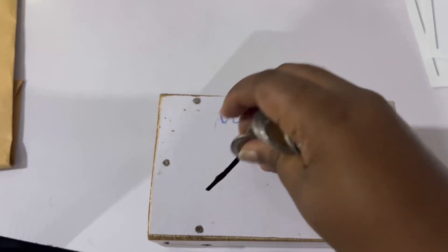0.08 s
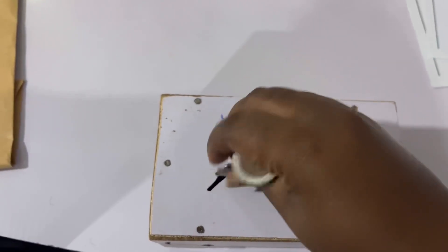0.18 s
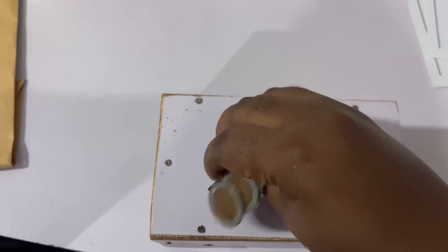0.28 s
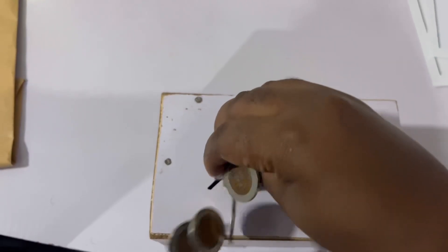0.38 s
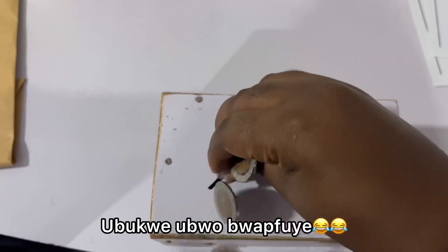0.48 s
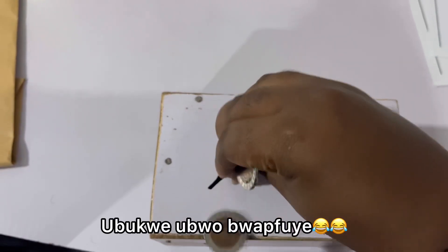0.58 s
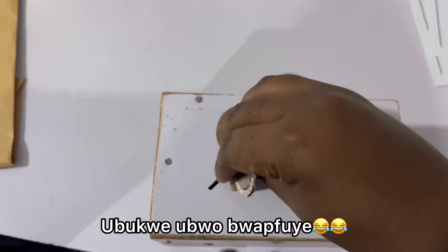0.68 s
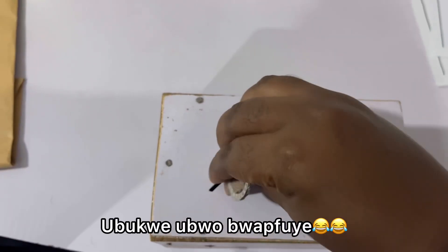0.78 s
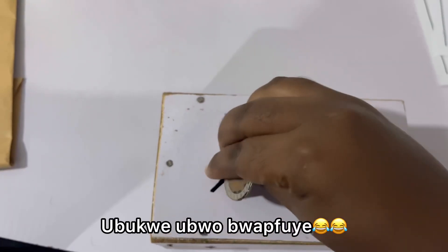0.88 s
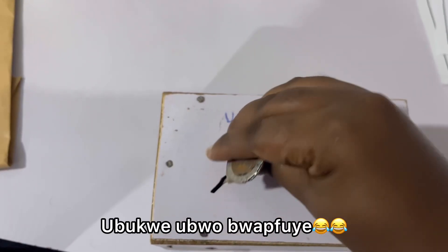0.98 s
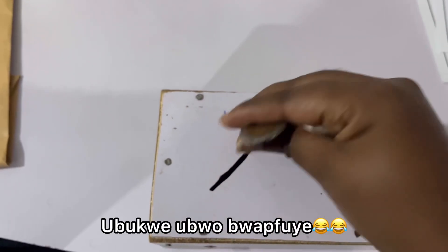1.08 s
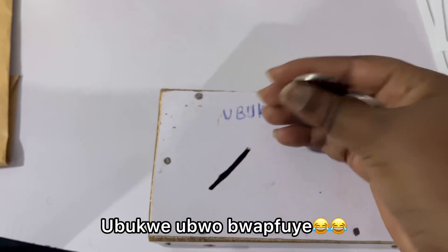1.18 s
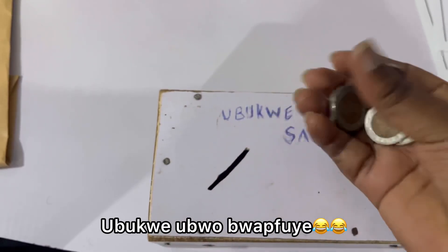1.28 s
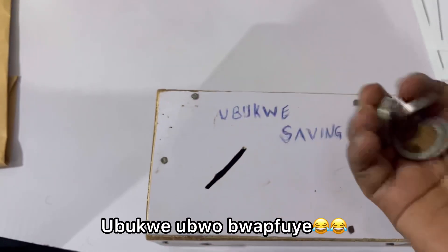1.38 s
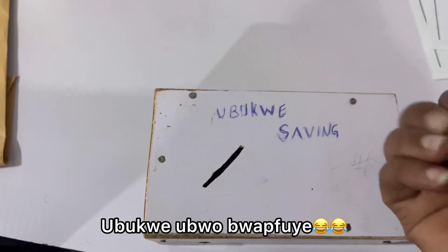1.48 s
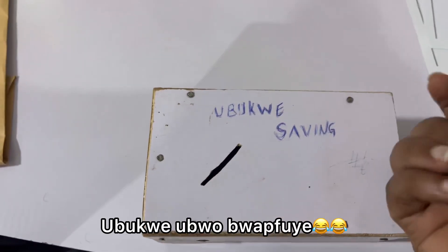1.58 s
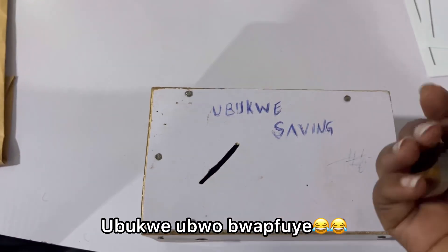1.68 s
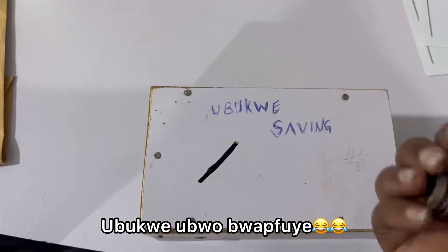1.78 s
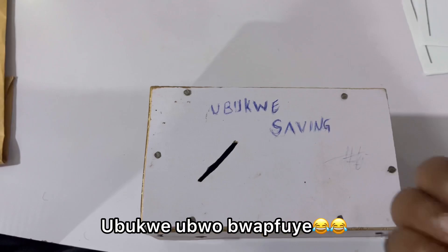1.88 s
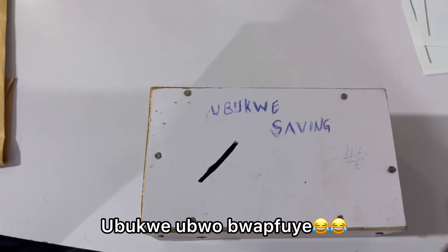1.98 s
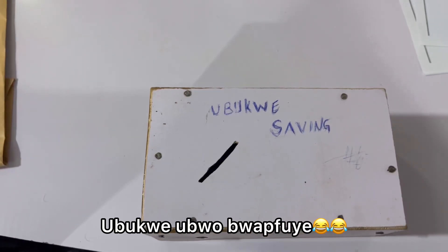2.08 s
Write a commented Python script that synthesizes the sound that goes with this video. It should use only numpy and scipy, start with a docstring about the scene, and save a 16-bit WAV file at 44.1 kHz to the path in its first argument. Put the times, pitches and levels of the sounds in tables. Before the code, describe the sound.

Coins clatter against a small wooden money box, close-miked in a bare, echoing room. Faint hand clinks lead to a first knock at 0.2 s; coins bounce on the damped lid at 0.33-0.6 s, while others rattle and thump hollowly inside from 0.5 to 0.96 s. After a lull, leftover coins clink in the hand, brightest at 1.46-1.57 s, then fade to light jingles until 2.15 s over a faint low hum.

```python
"""Close to the microphones in a bare room, a handful of coins is pushed at the slot of a small wooden money box.
First come faint clinks in the hand, then some coins spill and bounce on the lid, a damped wooden plate;
others drop inside and clatter, as bursts of coloured noise, and thump the ringing body of the box.
Then the hand draws back and the coins left in it clink together. Loose coins sing now and then as wavering
sines; a decaying stereo tail gives the room, and a steady low background lies under it all."""
import sys
import numpy as np
from scipy import signal
from scipy.fft import rfft, irfft
from scipy.io import wavfile

SR = 44100
rng = np.random.default_rng(int(sys.argv[2]) if len(sys.argv) > 2 else 0)


def transcribe(u):
    """Save the signal u as a 16-bit wav file named by the first command-line argument.

    u: samples, shape (n,) or (channels, n), limited to [-1, 1]; the rate is SR.
    q: integer samples, one column per channel.
    """
    v = np.clip(np.atleast_2d(u).T, -1, 1)
    q = np.round(v * 32767).astype(np.int16)
    wavfile.write(sys.argv[1], SR, q)


N = 94815
T = np.arange(N) / SR

# Coins bounce on the lid. Each row: start in seconds, wood level in dB, pitch ratio,
# hardness in dB per octave, then clack, clash, jingle and ting levels in dB.
LID_HITS = [(0.2089, -7.5, 1.0, -5, -21, -17.5, -16.5, -40),
            (0.3324, -13, 0.96, 8.5, -10, -21, -3.5, -12.5),
            (0.3660, 1.5, 0.94, -0.5, -14.5, -8.5, -5, -24), (0.3934, 0.5, 0.93, 0.5, -9, -9, -5.5, -21),
            (0.4922, 2, 0.94, -1, -3.5, -6.5, -5, -20), (0.606, -7.5, 0.97, 3, -34, -8, -2, -18.5)]
# Coins clatter in the slot and the box. Each row: start in seconds, decay time constant in seconds,
# then clack, clash, jingle and ting levels in dB.
CLATTERS = [(0.5175, 0.0088, -22, -28, -38, -27.5), (0.5652, 0.01, -8.5, -26, -42, -30.5),
            (0.587, 0.0033, -17, -33.5, -20, -37), (0.595, 0.008, -15.5, -24, -27, -51),
            (0.7265, 0.013, -8.5, -9, -23.5, -44), (0.7405, 0.0035, -5.5, -4.5, -11.5, -26),
            (0.751, 0.018, -17.5, -18, -39, -34), (0.7668, 0.004, -9.5, -21, -20, -26),
            (0.8555, 0.0068, -43, -28, -26, -26.5), (0.8665, 0.015, -45, -21.5, -16.5, -23.5),
            (0.89, 0.015, -45, -28, -25, -24), (0.9065, 0.0037, -15, -20.5, -19.5, -33),
            (0.9155, 0.0051, -21.5, -23.5, -21.5, -16), (0.9615, 0.0072, -29, -26, -29.5, -45)]
# A loose coin rattles on between bounces. Each row: start in seconds, decay time constant in seconds,
# then clack, clash, jingle and ting levels in dB.
RATTLES = [(0.325, 0.008, -29.5, -23.5, -34.5, -45), (0.344, 0.061, -22, -23, -32.5, -25.5),
           (0.401, 0.0091, -39.5, -21, -38, -31), (0.926, 0.022, -26, -29.5, -35.5, -33)]
# Coins clink in the hand. Each row: start in seconds, decay time constant in seconds,
# then clack, clash, jingle and ting levels in dB.
CLINKS = [(0.008, 0.0053, -37.5, -37.5, -37.5, -33.5), (0.0905, 0.0026, -41, -32.5, -28.5, -27.5),
          (0.176, 0.043, -57, -43, -37.5, -43), (0.198, 0.019, -36, -59, -29.5, -35),
          (0.2155, 0.00096, -31, -22.5, -19, -17.5), (0.2682, 0.0017, -45.5, -34, -21.5, -38),
          (0.2955, 0.003, -46, -34, -27.5, -39), (0.3135, 0.017, -57, -42, -42, -34),
          (1.165, 0.0074, -34.5, -35.5, -34.5, -38), (1.178, 0.0011, -42, -32, -28.5, -29),
          (1.231, 0.0081, -63, -61, -39, -43), (1.278, 0.0017, -48, -54, -36.5, -33),
          (1.309, 0.013, -42.5, -42.5, -42, -41), (1.379, 0.0033, -34, -37, -27, -24),
          (1.3872, 0.0068, -28, -25.5, -24, -23), (1.41, 0.025, -41.5, -28, -19, -19),
          (1.4642, 0.0047, -36, -22, -16, -8), (1.519, 0.0025, -26, -16.5, -17, -8.5),
          (1.5447, 0.00087, -20.5, -6.5, -5, -8), (1.5488, 0.00077, -22, -16, -0.5, -4),
          (1.566, 0.016, -43, -23.5, -24.5, -26), (1.726, 0.0018, -33, -28, -27, -22),
          (1.7375, 0.016, -39.5, -32, -26.5, -20), (1.758, 0.011, -36, -26.5, -23, -46),
          (1.795, 0.019, -39.5, -59, -65, -59), (1.82, 0.0032, -45, -24, -24.5, -23),
          (1.8495, 0.0066, -59, -52, -36.5, -33), (1.857, 0.023, -50, -29, -16, -20.5),
          (1.876, 0.0089, -44, -29.5, -44, -22), (1.982, 0.0052, -64, -30, -28.5, -28),
          (1.9875, 0.025, -54.5, -40.5, -40.5, -33), (2.0905, 0.013, -60, -40, -32, -32.5),
          (2.11, 0.032, -62, -39, -38, -32.5), (2.139, 0.014, -65, -45, -36, -32.5)]
# Colours of a coin's contact in four registers, from low to high. Each row: frequency in Hz, relative level in dB.
CLACK_COLOUR = [(60, -68.5), (400, -20), (800, -17.5), (1100, -5.5), (1450, -3), (2300, -6), (3100, -11.5),
                (5000, -47.5)]
CLASH_COLOUR = [(1700, -30.5), (2600, -6), (3400, 0), (4450, 2.5), (5150, 2), (5900, -30.5), (7500, -27.5)]
JINGLE_COLOUR = [(4500, -47.5), (5800, 1), (6900, 4.5), (7700, -1.5), (8900, -9.5), (9900, -14.5),
                 (12000, -28)]
TING_COLOUR = [(9000, -30), (10500, 2), (11500, 12.5), (12450, 5), (13100, 26), (13600, 10.5), (14100, 13),
               (14600, -9), (15600, -2), (17000, -31)]
# Left-right likeness of a contact, 0 to 1. One value each for clack, clash, jingle and ting.
CONTACT_LIKENESS = (0.17, 0.17, 1, 0.86)
# How much later the left side hears a contact; negative is earlier. In seconds, for clack, clash, jingle, ting.
CONTACT_LAG_S = (0, .00002, -.00024, -.00024)
# Single coins ring freely. Each row: start in seconds, pitch in Hz, level in dB before the tone is halved,
# time to fall 60 dB in seconds.
RINGS = [(.338, 13020, -15, .33), (.442, 13400, -27, .2), (.521, 13400, -16, .18), (.61, 13150, -30, .45),
         (.7275, 3400, -17, .1), (.7405, 4350, -9, .07), (.755, 13000, -32, .3), (.815, 13050, -32, .25),
         (.917, 13080, -33, .8), (.917, 11950, -22, .07), (1.411, 7844, -28, .12), (1.411, 8824, -30, .12),
         (1.411, 12120, -27, .12), (1.465, 13250, -25, .2), (1.519, 2900, -13, .007),
         (1.52, 12850, -29, .25), (1.549, 4684, -31, .22), (1.549, 7560, -32, .15), (1.549, 13250, -31, .5),
         (1.738, 13350, -27, .2), (1.858, 12940, -26, .28), (1.858, 8260, -31, .15),
         (2.003, 13300, -36, .2), (2.0905, 13380, -31, .3)]
# Long-ringing modes of the coins, stirred by every contact. One value a mode: pitch in Hz; level in dB.
COIN_HZ = [3402, 3820, 4259, 4336, 4392, 4620, 7355, 7610, 7840, 7981, 8826, 12830, 12980]
COIN_DB = [-45, -49.5, -78, -56.5, -50, -43, -84, -70.5, -86, -46, -46, -50.5, -77]
# The lid, damped by the hand resting on it. One value a mode: pitch in Hz; level in dB;
# time to fall 60 dB in seconds; lead of the right side in radians.
LID_HZ = [305, 390, 470, 775, 1540, 1680, 2300, 3250]
LID_DB = [1.9, 4.8, 4.2, 11.2, 6.8, 5.9, 6, 2.7]
LID_T60_S = [0.014, 0.015, 0.016, 0.025, 0.0094, 0.02, 0.014, 0.013]
LID_LEAD_RAD = [.4, .6, .7, 1.0, .1, .1, .5, .8]
# Coins thump against the box; the faintest rows are soft low bumps from a dying earlier knock and the moving hand.
# Each row: start in seconds, level in dB, centre of the blow in Hz.
THUMPS = [(.004, -36.5, 436), (0.165, -39, 470), (.343, -12.5, 268), (.515, -4.5, 1270), (0.558, -17, 613),
          (0.565, 4, 980), (.574, -2.5, 690), (0.582, -8.5, 435), (0.6032, -13, 593), (0.7267, -4.5, 780),
          (.739, -5, 458), (0.7665, 3, 410), (0.777, -30, 300), (0.889, -8.5, 1220), (0.9045, 2, 730),
          (0.9154, -7, 910), (0.961, -4.5, 516), (1.546, -37, 536), (1.745, -39.5, 650),
          (1.801, -39.5, 645)]
# The body of the box. One value a mode: pitch in Hz; level in dB; time to fall 60 dB in seconds.
BOX_HZ = [110, 155, 263, 423, 550, 730, 805, 1042, 1195, 1370, 1800, 2200]
BOX_DB = [-17.5, -19.5, -8.5, -7, -2.5, 4.5, 0, -10.5, -12, -10, -19.5, -29]
BOX_T60_S = [0.12, 0.074, 0.048, 0.048, 0.023, 0.01, 0.025, 0.036, 0.039, 0.03, 0.06, 0.017]
# Decay of the room. Each row: frequency in Hz, time to fall 60 dB in seconds.
ROOM_T60 = [(100, 1), (260, 0.62), (700, 0.56), (1800, 0.73), (4800, 0.55), (8000, 0.57), (13000, 0.57)]
# Colour of the room's tail. Each row: frequency in Hz, relative level in dB.
ROOM_COLOUR = [(60, 2), (150, 0.5), (300, 12), (700, 4.5), (1500, -5), (4200, -0.5), (6000, -13),
               (8000, -6.5), (10200, -8), (13000, -14.5), (16000, -28)]
# Left-right likeness of the room's tail. Each row: frequency in Hz, likeness from 0 to 1.
ROOM_LIKENESS = [(500, .4), (4500, .3), (5800, .95)]
# Standing waves of the room. Each row: pitch in Hz, level in dB, time to fall 60 dB in seconds.
ROOM_MODES = [(108.9, -44.5, 1), (157.6, -37.5, 0.53), (182.7, -48, 0.49), (240, -82, 0.11),
              (425, -61.5, 0.74), (504, -64, 0.21)]
# Colour of the steady background. Each row: frequency in Hz, relative level in dB.
BACKGROUND_COLOUR = [(20, -16), (35, -8), (52, 3.5), (75, -6), (150, -10), (220, -16), (700, -25.5),
                     (4000, -24.5), (9000, -37.5), (13000, -37), (16000, -53.5)]

CHATTER_PER_S, CHATTER_DECAY_S, CHATTER_SHARE = 750, 0.0006, 0.55  # share of the power that is spiky
CONTACT_RISE_S, FIRST_TOUCH_S = 0.0003, 0.004
COIN_T60_S = 0.12
LID_CLICK_S, LID_CONTACT_S = 0.0018, 0.0066  # decay of the metal click, swell of the wood
LID_LAG_S, BOX_LAG_S = 0.00006, 0.00005  # how much later the left side hears the wood
BOX_PHASE_SPREAD_RAD = 0.4
WOOD_LOW_CUT_HZ = 85
ROOM_ONSET_S = 0.00086
WOOD_SEND_DB, CLATTER_SEND_DB, HAND_SEND_DB = -15, -4.5, -2  # how strongly each source excites the room
BACKGROUND_DB = -51.5
DRIVE_DB, CEILING, TOP_CUT_HZ = 1.5, 0.94, 17000


def from_db(db):
    """Decibels to gain."""
    return 10 ** (np.asarray(db) / 20)


def at_hz(points, hz):
    """Reads a table on a log-frequency axis."""
    f, value = np.transpose(points)
    return np.interp(np.log(np.maximum(hz, 1)), np.log(f), value)


def stereo(mid, side, likeness):
    """Mixes two independent signals into a left and a right of the given likeness."""
    return np.sqrt(1 + likeness) * mid + np.sqrt(1 - likeness) * side * [[1], [-1]]


def noise(colour, likeness):
    """Stereo noise of a given colour and left-right likeness; rms 1."""
    gain = from_db(at_hz(colour, np.arange(N + 1) * SR / (2 * N)))
    mid, side = irfft(rfft(rng.standard_normal((2, 2 * N))) * gain)[:, :N]
    x = stereo(mid, side, likeness)
    return x / x.std()


def place(x, lag_s):
    """Sets a source off centre: the left side hears it later by lag_s."""
    hz = np.arange(N + 1) * SR / (2 * N)
    half_lags = np.exp(1j * np.pi * hz * lag_s * np.array([[-1], [1]]))
    return irfft(rfft(x, 2 * N) * half_lags)[:, :N]


def chatter():
    """Coins touch again and again within one clink: a spiky gain of mean power 1."""
    touches = (rng.random(N) < CHATTER_PER_S / SR) * rng.random(N)
    decay = np.exp(-1 / (CHATTER_DECAY_S * SR))
    power = signal.lfilter([1], [1, -decay], touches + 1e-18)
    return np.sqrt(1 - CHATTER_SHARE + CHATTER_SHARE * power / power.mean())


def contacts(rows):
    """A clean first touch, then chatter, excites the crowded metal modes of four registers."""
    power, touches = np.zeros((4, N)), chatter() ** 2
    for s, decay_s, *levels_db in rows:
        t = np.maximum(T - s, 0)
        rise = (T >= s) * (1 - np.exp(-t / CONTACT_RISE_S)) ** 2
        decay = np.exp(-np.minimum(2 * t / decay_s, 60))
        envelope = rise * decay * np.where(t < FIRST_TOUCH_S, 1, touches)
        power += from_db(levels_db)[:, None] ** 2 * envelope
    colours = (CLACK_COLOUR, CLASH_COLOUR, JINGLE_COLOUR, TING_COLOUR)
    out = 0
    for p, colour, likeness, lag_s in zip(power, colours, CONTACT_LIKENESS, CONTACT_LAG_S):
        out = out + place(np.sqrt(p) * noise(colour, likeness), lag_s)
    return out


def with_ringing(x):
    """Adds the faint after-ring of the metal: every contact stirs the coins' long modes."""
    t = T[:SR // 2]
    modes = zip(COIN_HZ, COIN_DB)
    ring = sum(from_db(db - 60 * t / COIN_T60_S) * np.sin(2 * np.pi * hz * t) for hz, db in modes)
    return x + signal.fftconvolve(x, ring[None], axes=1)[:, :N]


def coin_rings(wobble_hz=70, wobble=0.75, swell_s=0.0012):
    """A loose coin sings on one high mode, wavering as it tumbles."""
    low_pass = signal.butter(2, wobble_hz, fs=SR, output="sos")
    slow = signal.sosfilt(low_pass, rng.standard_normal((2, N)))
    a, b = wobble * slow / slow.std()
    out = 0
    for s, hz, db, t60 in RINGS:
        t = np.maximum(T - s, 0)
        phase = 2 * np.pi * hz * t
        tone = (1 + a) * np.sin(phase) + b * np.cos(phase)
        out = out + from_db(db - 60 * t / t60) * (1 - np.exp(-t / swell_s)) * tone / 2
    return place(out, CONTACT_LAG_S[-1])


def strike(s, modes, contact_s, leads_rad):
    """Damped modes swell during the contact and die away; each reaches the two sides with its own lead."""
    out, start, t = np.zeros((2, N + SR)), int(s * SR), T[:SR // 4]
    sides = np.array([[-0.5], [0.5]])
    ring = 0
    for k, (hz, db, t60) in enumerate(modes):
        tone = np.sin(2 * np.pi * hz * t + sides * leads_rad[k])
        ring = ring + (-1) ** k * from_db(db - 60 * t / t60) * tone  # neighbours start in opposite phase
    out[:, start:start + len(t)] = ring * (1 - np.exp(-t / contact_s))
    return out[:, :N]


def lid_knocks(pivot_hz=750):
    """The thin lid sounds a short hollow note at each bounce; a hard hit favours its upper modes."""
    pitches_hz, octaves = np.array(LID_HZ), np.log2(np.array(LID_HZ) / pivot_hz)
    out = 0
    for s, wood_db, ratio, hardness_db, *_ in LID_HITS:
        levels_db = np.array(LID_DB) + wood_db + hardness_db * octaves
        modes = zip(pitches_hz * ratio, levels_db, LID_T60_S)
        out = out + strike(s, modes, LID_CONTACT_S, LID_LEAD_RAD)
    return place(out, LID_LAG_S)


def box_thumps(focus_db=4.5, contact_s=0.00018, scatter=0.0068):
    """A blow favours the box modes near its centre; each mode's pitch varies slightly at random by blow."""
    pitches_hz = np.array(BOX_HZ)
    out = 0
    for s, level_db, centre_hz in THUMPS:
        shifts = 1 + scatter * rng.standard_normal(len(BOX_HZ))
        off_centre_octaves = np.log2(pitches_hz / centre_hz)
        levels_db = np.array(BOX_DB) + level_db - focus_db * off_centre_octaves ** 2
        leads_rad = BOX_PHASE_SPREAD_RAD * rng.standard_normal(len(BOX_HZ))
        out = out + strike(s, zip(pitches_hz * shifts, levels_db, BOX_T60_S), contact_s, leads_rad)
    return place(out, BOX_LAG_S)


def room(x):
    """A diffuse tail that dies band by band, with a few standing waves."""
    hz, t = np.arange(SR // 2 + 1), T[:SR]
    mid, side = rfft(rng.standard_normal((2, SR))) / np.sqrt(2)
    coloured = stereo(mid, side, at_hz(ROOM_LIKENESS, hz)) * from_db(at_hz(ROOM_COLOUR, hz))
    edges = np.geomspace(40, 18000, 28)
    tail = 0
    for low, high in zip(edges, edges[1:]):
        t60 = at_hz(ROOM_T60, np.sqrt(low * high))
        band = irfft(coloured * (hz >= low) * (hz < high), SR)
        even_energy = np.sqrt(2 * np.log(1000) / (t60 * SR))  # long and short decays carry alike
        tail = tail + band * from_db(-60 * t / t60) * even_energy
    for f, db, t60 in ROOM_MODES:
        tail = tail + from_db(db - 60 * t / t60) * np.sin(2 * np.pi * f * t)
    return signal.fftconvolve(x, tail * (1 - np.exp(-t / ROOM_ONSET_S)), axes=1)[:, :N]


def narrow_bass(x, corner_hz=300):
    """Long waves reach both microphones alike."""
    high_pass = signal.butter(1, corner_hz, "high", fs=SR, output="sos")
    side = signal.sosfilt(high_pass, (x[0] - x[1]) / 2)
    return x.mean(axis=0) + side * [[1], [-1]]


def background():
    """Steady low noise, almost the same at both microphones."""
    return from_db(BACKGROUND_DB) * noise(BACKGROUND_COLOUR, 0.98)


def scene(pan_db=0.51):
    """Wood, coins and their room over a low background, all a little to the right."""
    low_cut = signal.butter(4, WOOD_LOW_CUT_HZ, "high", fs=SR, output="sos")
    wood = signal.sosfilt(low_cut, lid_knocks() + box_thumps())
    lid_clicks = contacts([(s, LID_CLICK_S, *levels_db) for s, _, _, _, *levels_db in LID_HITS])
    clatter = lid_clicks + contacts([*CLATTERS, *RATTLES])
    hand, rings = contacts(CLINKS), coin_rings()
    into_room = from_db(WOOD_SEND_DB) * wood + from_db(CLATTER_SEND_DB) * (clatter + rings)
    echo = room(into_room + from_db(HAND_SEND_DB) * hand)
    mix = narrow_bass(wood + echo) + with_ringing(clatter + hand) + rings + background()
    return mix * from_db([[-pan_db], [pan_db]])


def record(dry):
    """The loudest knocks overload the recorder and bend towards a ceiling; the top is cut."""
    x = from_db(DRIVE_DB) * dry / CEILING
    clipped = CEILING * x / (1 + x ** 6) ** (1 / 6)
    return signal.sosfilt(signal.cheby2(14, 60, TOP_CUT_HZ, fs=SR, output="sos"), clipped)


dry = scene()
out = record(dry)
transcribe(out)
```